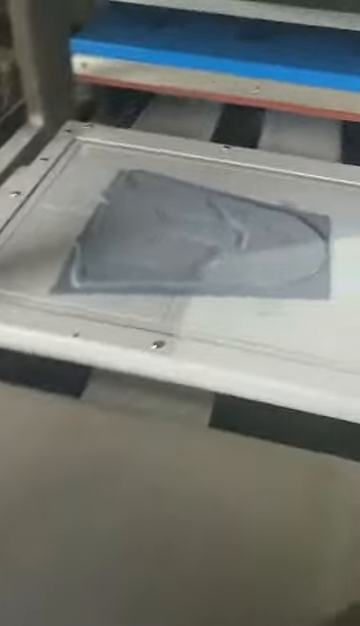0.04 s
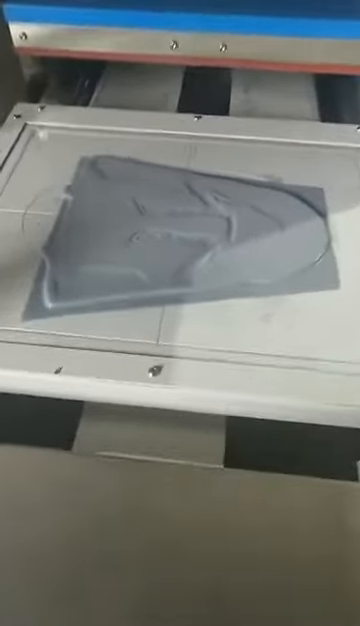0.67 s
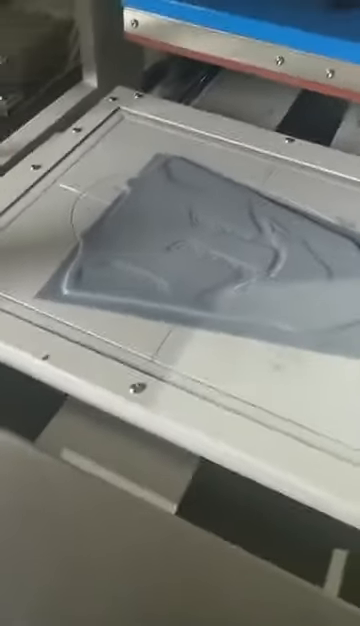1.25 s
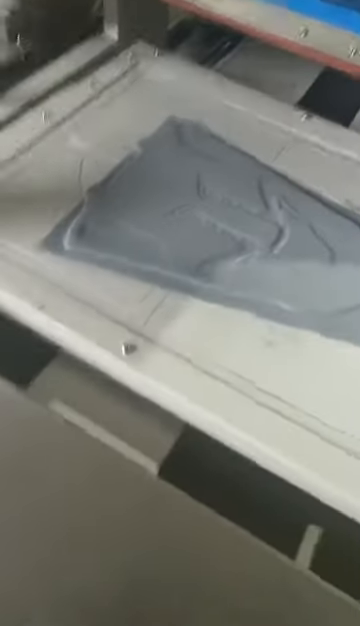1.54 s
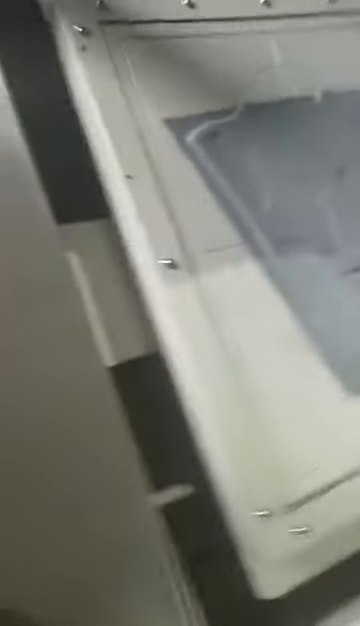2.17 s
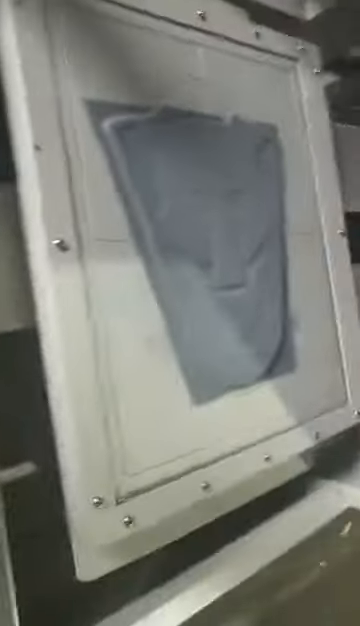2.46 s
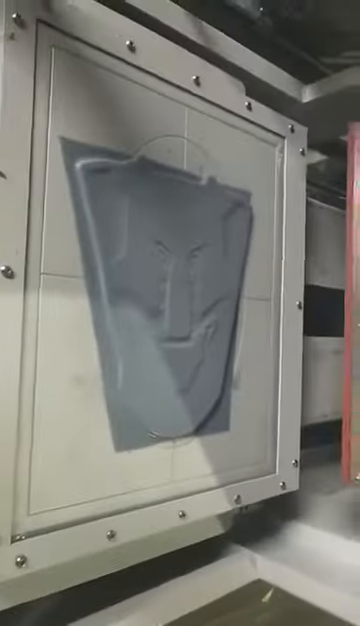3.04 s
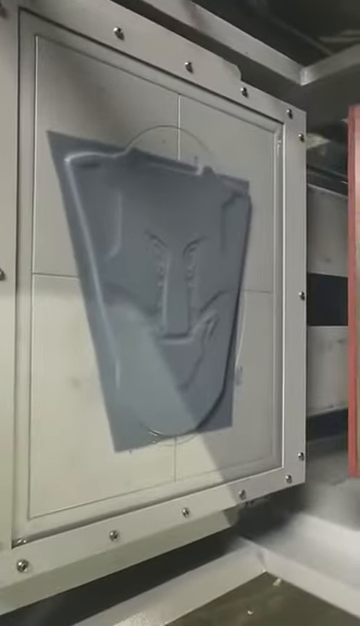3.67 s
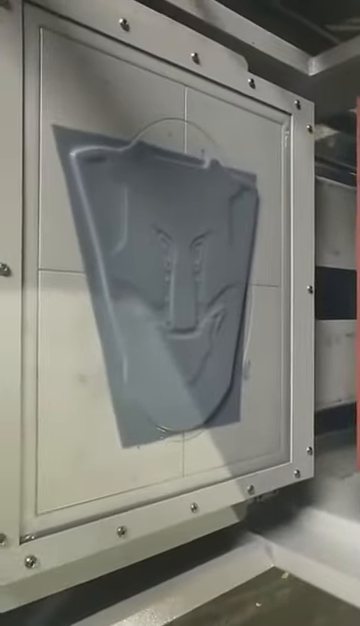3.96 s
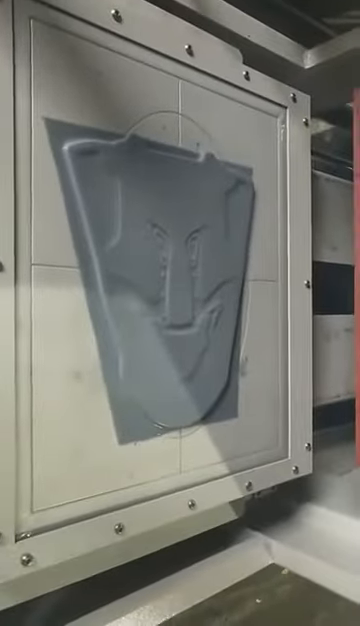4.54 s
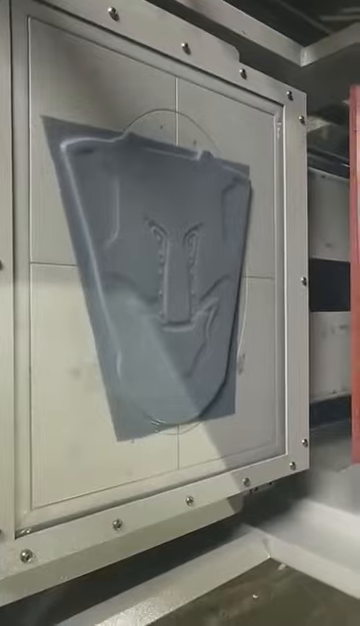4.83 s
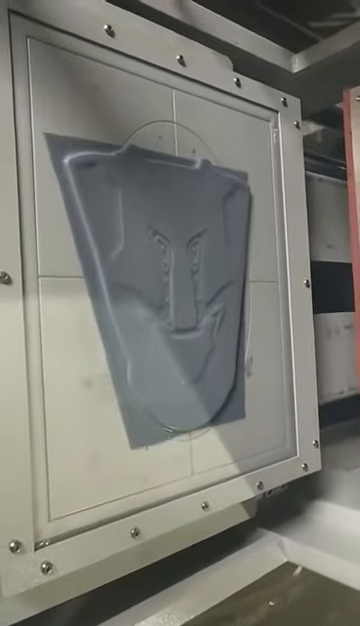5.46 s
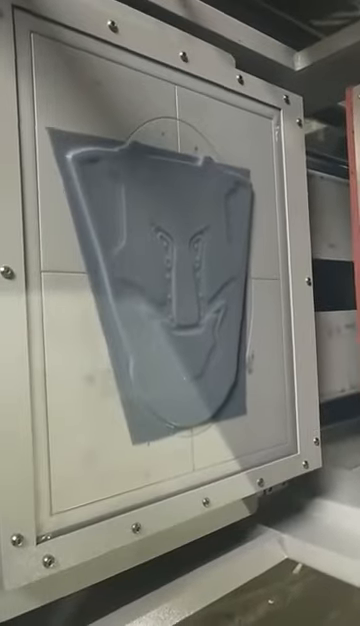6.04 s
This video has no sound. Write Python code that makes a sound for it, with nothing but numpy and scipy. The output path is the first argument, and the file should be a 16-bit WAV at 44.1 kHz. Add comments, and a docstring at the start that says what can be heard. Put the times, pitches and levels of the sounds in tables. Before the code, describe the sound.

Over the dull roar of a factory, the air blower of an industrial press spins up. Its low tone rises and grows louder along with a surging rumble in the duct, then levels off after about two seconds. Air rings the housing and whines and hisses through gaps in the metal frame. As the microphone swings from the front to the side, the whine strengthens and the hiss steps up, then everything runs steadily.

```python
"""The air blower of a vacuum welding press spins up and settles at full speed in a humming factory.
Its passing blades make a rising tone, and swirling air rumbles in its duct.
Moving air makes the housing ring, and whines and hisses through the gaps of the frame.
The microphone swings from the front of the press to its side, where the whine is strongest."""
import sys
import numpy as np
from scipy import signal
from scipy.fft import rfft, irfft, next_fast_len
from scipy.io import wavfile
from scipy.ndimage import uniform_filter1d, map_coordinates

SR = 44100
rng = np.random.default_rng(int(sys.argv[2]) if len(sys.argv) > 2 else 0)


def wav_record(signal):
    """Record a signal, one row per channel, as 16-bit PCM in the file named by sys.argv[1]."""
    frames = np.transpose(np.atleast_2d(signal))
    bounded = np.clip(frames, -1, 1)
    # unit amplitude maps onto the largest positive 16-bit level
    quanta = np.round(bounded * 32767).astype(np.int16)
    wavfile.write(sys.argv[1], SR, quanta)


N = 277830
TIME = np.arange(N) / SR
FULL_HZ = 172.2  # blades passing per second at full speed


def blower(surge_s=0.026):
    """The blade tone and the duct's rumble swell together with each surge of air."""
    # the strongest surges: (time [s], rise above the steady rumble [dB])
    surges = [(1.07, 6), (1.63, 6), (2.86, 5), (2.95, 4.5), (3.2, 4), (3.36, 6), (3.49, 4), (3.6, 5),
              (3.75, 4.5), (4.19, 5), (4.36, 7), (4.49, 3.5), (4.74, 6.5), (4.92, 4.5), (5.34, 6),
              (6.08, 4)]
    surge_db = sum(db * bump(s, surge_s) for s, db in surges)
    return blade_tone(surge_db) + duct_rumble(surge_db)


def blade_pitch(start_hz=90, run_up_s=1.13):
    """How often a blade passes, in Hz: the motor gathers speed and levels off."""
    return FULL_HZ - (FULL_HZ - start_hz) * np.exp(-(TIME / run_up_s) ** 1.55)  # above 1: a gentle start


def blade_tone(surge_db, waver_hz=1.21, flutter_db=3, swell_db=2.4, surge_share=0.68):
    """Each passing blade pushes the air; the pushes blend into one unsteady tone."""
    # the microphone crosses a loud and a quiet spot of the tone's standing wave:
    # (time [s], half-length [s], level change [dB])
    spots = [(2.074, .32, 9.5), (2.6, .2, -17)]
    spot_db = sum(db * bump(s, length) for s, length, db in spots)
    unsteady_db = flutter_db * wobble(13) + swell_db * wobble(3)
    gain = loudness(front_db=-30.5, side_db=-31.5, growth=3.5)
    pitch = blade_pitch() + waver_hz * wobble(11)
    return gain * amp(spot_db + unsteady_db + surge_share * surge_db) * tone(pitch)


def duct_rumble(surge_db, small_surge_db=1.5):
    """Swirling air rumbles in the duct; only the main resonance, near 150 Hz, surges."""
    # the rumble's colour: (frequency [Hz], level [dB])
    colour = [(12, -33.5), (35, -24.5), (55, -19), (72, -9), (83, -16), (105, -8), (130, -3), (158, 0),
              (176, -1.5), (197, -12), (232, -9), (265, -12.5), (330, -9.5), (385, -21), (455, -21),
              (620, -41.5)]
    rumble = rush(colour)
    core = filtered(rumble, lambda hz: 1 / (1 + ((hz - 150) / 55) ** 8))
    surging = core.std() * amp(surge_db + small_surge_db * wobble(14)) * even(core)
    return loudness(front_db=-24.5, side_db=-23, growth=2.9) * (rumble - core + surging)


def airflow(ease_from_s=4.1, ease_db_per_s=-0.5, gust_db=0.6):
    """The whole stream of air pulses slightly and slowly eases off at full speed."""
    stream = housing_rush() + gap_whine() + frame_ring() + air_hiss() + hiss_flares()
    easing_db = ease_db_per_s * np.maximum(TIME - ease_from_s, 0)
    return amp(easing_db + gust_db * wobble(12)) * stream


def housing_rush():
    """Rushing air makes the blower's housing ring."""
    # the housing's resonances: (frequency [Hz], width [Hz], level [dB])
    resonances = [(616, 41, -8), (690.4, 42, 1), (780, 90, -17), (849, 66, -3.5), (1002, 70, -7.5),
                  (1092, 44, -10), (1360, 95, -20.5)]
    return loudness(front_db=-35.2, side_db=-30.9, growth=2.2, lag=0.37) * even(blown(resonances))


def gap_whine(flutter_db=1.14):
    """Air whines through the gap under the frame."""
    # the gap's resonances: (frequency [Hz], width [Hz], level [dB])
    resonances = [(1432, 28, -17), (1565, 39, -12.5), (1597, 31, -5), (1639.5, 19, 0.5), (1677, 28, -3.5),
                  (1734, 41, -12.5), (1815, 42, -8), (1944, 40, -15.5)]
    gain = loudness(front_db=-36.5, side_db=-26.4, growth=4, lag=0.5)
    return gain * amp(flutter_db * wobble(16)) * even(blown(resonances))


def frame_ring():
    """Air rings the hollow spaces of the frame, higher than the whine."""
    # their resonances: (frequency [Hz], width [Hz], front level [dB], side level [dB])
    hollows = [(2020, 56, -15.5, -6), (2160, 28, 1, -3.5), (2226, 37, -5.5, -2.5), (2452, 37, 0.5, 2.5),
               (2540, 28, -0.5, -4.5), (2628, 62, -2.5, -5), (2824, 85, -1.5, -7.5)]
    front = blown([(hz, width, db) for hz, width, db, _ in hollows])
    side = blown([(hz, width, db) for hz, width, _, db in hollows])
    return loudness(front_db=-40.6, side_db=-31.7, growth=2.9, lag=2.3) * swing(front, side)


def air_hiss(shut_db=-31.5, open_s=0.42, clear_s=2.9, clear_db=2.5, shimmer_db=0.68):
    """The hiss of escaping air fades in, then steps up as the microphone clears the frame's edge."""
    # the hiss at the front: (frequency [Hz], level [dB])
    front_colour = [(500, -23), (1300, -5.5), (2100, -6), (2750, -3), (3020, -1.5), (3350, 2.5), (3700, -1),
                    (4100, 2.5), (4500, -3), (5200, -3), (6050, -1), (6500, -2.5), (7500, -2.5)]
    # the hiss at the side: (frequency [Hz], level [dB])
    side_colour = [(500, -24.5), (1300, -8), (2330, -9), (2900, -3.5), (3160, -0.5), (3290, -1), (3450, -3),
                   (3700, 0.5), (3950, 1), (4400, -4.5), (5150, -7), (6000, -3.5), (7220, 1.5),
                   (7550, -6.5)]
    front = plate_echoes(rush(front_colour), echo_db=-11)
    side = plate_echoes(rush(side_colour), echo_db=-13)
    opening_db = shut_db * np.exp(-TIME / open_s)
    clearing_db = clear_db * (1 + np.tanh((TIME - clear_s) / 0.044)) / 2
    gain = loudness(front_db=-34, side_db=-33.5, growth=1.1)
    return gain * amp(opening_db + clearing_db + shimmer_db * wobble(30)) * swing(front, side)


def hiss_flares():
    """Narrow bands of hiss flare up as the microphone sweeps past the frame."""
    # the flares: (time [s], half-length [s], frequency [Hz], width [Hz], level [dB])
    flares = [(1.8, 0.36, 3360, 70, -45.5), (1.966, 0.085, 4250, 400, -44), (2.07, 0.074, 4800, 497, -38.5),
              (2.397, .3, 6980, 710, -41.5), (2.48, 0.57, 1112, 64.7, -38.5)]
    return sum(amp(db) * bump(s, length) * blown([(hz, width, 0)]) for s, length, hz, width, db in flares)


def plate_echoes(x, echo_db, spread_s=0.009, count=14):
    """Short echoes between the steel plates of the press give a hollow colour."""
    delays = rng.uniform(0.15, 1, count) * spread_s
    echoes = np.zeros(int(spread_s * SR) + 2)
    echoes[(delays * SR).astype(int)] = amp(echo_db) * rng.choice([-1, 1], count) / np.sqrt(count)
    echoes[0] = 1  # the direct sound
    return unit(signal.fftconvolve(x, echoes)[:N])


def factory(roar_db=-36, drift_hz=0.88, waver_db=3, boom_db=-28.5):
    """Distant machines make a dull roar and a few unsteady hums; the lowest hum booms once."""
    # the roar's colour: (frequency [Hz], level [dB])
    colour = [(15, -37.5), (40, -23.5), (65, -9.5), (100, -1), (165, -5.5), (230, -3.5), (340, -8.5),
              (480, -7.5), (700, -10.5), (1050, -14.5), (1400, -19), (2900, -23.5), (4200, -27.5),
              (7500, -36)]
    # the machines' hums, lowest first: (pitch [Hz], level [dB])
    hums = [(171.5, -42), (452, -55), (544.5, -54), (727, -57), (996, -53)]
    humming = sum(amp(db + waver_db * wobble(1.6)) * tone(hz + drift_hz * wobble(6)) for hz, db in hums)
    boom = amp(boom_db) * bump(s=0.42, half_length=0.035) * tone(np.full(N, hums[0][0]))
    return amp(roar_db) * rush(colour) + humming + boom


def position():
    """Where the microphone is at each moment."""
    # the swing round the press: (time [s], position [0 front, 1 side])
    path = [(1.5, 0), (1.97, .12), (2.13, 0.54), (2.45, 0.83), (2.95, 0.99)]
    times, places = np.transpose(path)
    return np.interp(TIME, times, places)


def swing(front, side):
    """Fade from the front sound to the side sound as the microphone moves."""
    return np.sqrt(1 - position()) * front + np.sqrt(position()) * side


def loudness(front_db, side_db, growth, lag=1):
    """A part's gain: it rises with speed to the power growth; a larger lag reaches side_db later."""
    full_speed_db = front_db + (side_db - front_db) * position() ** lag
    return amp(full_speed_db) * (blade_pitch() / FULL_HZ) ** growth


def amp(db):
    """Turn decibels into a gain."""
    return 10 ** (np.asarray(db) / 20)


def unit(x):
    """Scale x to an average strength (rms) of 1."""
    return x / np.sqrt(np.mean(x ** 2) + 1e-20)


def wobble(rate):
    """A smooth curve through rate random values a second."""
    return map_coordinates(rng.standard_normal(int(TIME[-1] * rate) + 4), [TIME * rate])


def bump(s, half_length):
    """A bell-shaped swell around time s."""
    return np.exp(-((TIME - s) / half_length) ** 2)


def filtered(x, response):
    """Scale each frequency in x by the gain response(hz)."""
    size = next_fast_len(N + SR // 2)
    return irfft(rfft(x, size) * response(np.fft.rfftfreq(size, 1 / SR)), size)[:N]


def rush(colour):
    """Noise of strength 1, shaped by (frequency, level) points."""
    freqs, db = np.transpose(colour)
    response = lambda hz: amp(np.interp(np.log(hz + 1), np.log(freqs), db, left=-120, right=-120))
    return unit(filtered(rng.standard_normal(N), response))


def blown(resonances):
    """Noise of strength 1 that rings at each (frequency, width, level) resonance."""
    def power(hz):
        return sum((amp(db) / (1 + ((hz - centre) / width) ** 2)) ** 2 for centre, width, db in resonances)
    return unit(filtered(rng.standard_normal(N), lambda hz: np.sqrt(power(hz))))


def even(x):
    """Smooth out slow swells, holding x near strength 1."""
    return x / np.sqrt(np.abs(uniform_filter1d(x ** 2, SR // 11)) + 1e-12)


def tone(hz):
    """A sine wave of strength 1 that follows a pitch curve."""
    return np.sqrt(2) * np.sin(2 * np.pi * np.cumsum(hz) / SR)


def scene():
    """Blower, moving air and factory, the same in both channels."""
    mono = blower() + airflow() + factory()
    return np.array([mono, mono])


def record(dry):
    """Cut off the highest treble."""
    top_hz, fade_hz = 7540, 140
    treble_cut = lambda hz: np.clip((top_hz - hz) / fade_hz + 0.5, 0, 1)
    return np.array([filtered(channel, treble_cut) for channel in dry])


dry = scene()
out = record(dry)
wav_record(out)
```